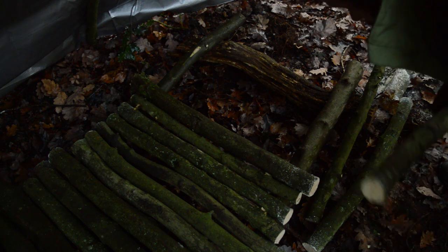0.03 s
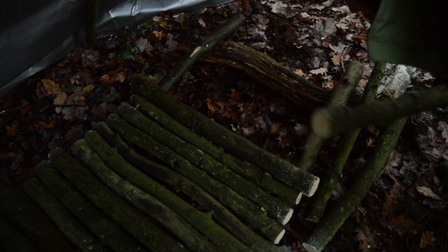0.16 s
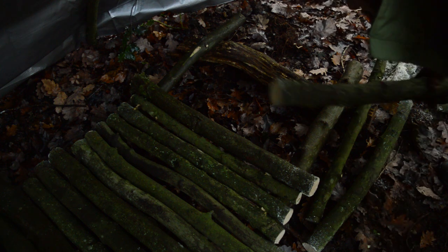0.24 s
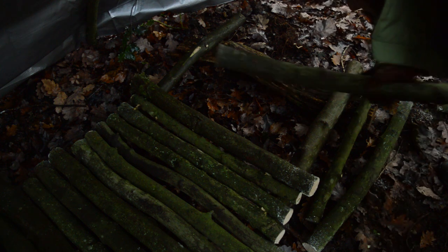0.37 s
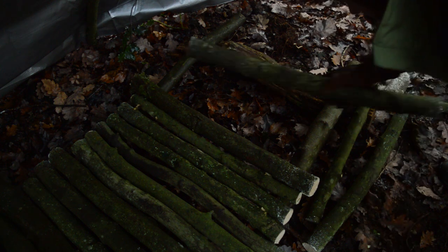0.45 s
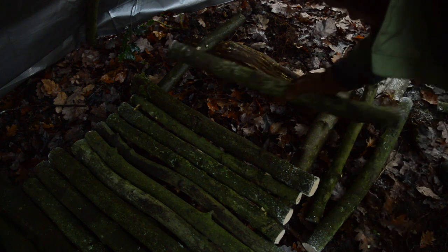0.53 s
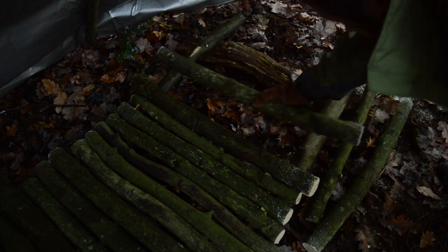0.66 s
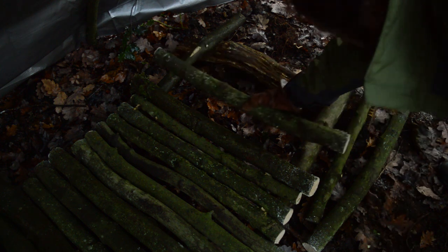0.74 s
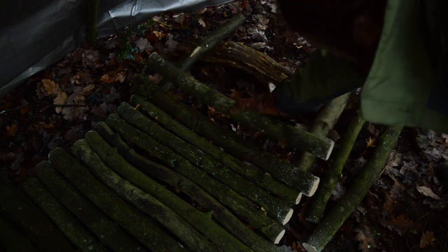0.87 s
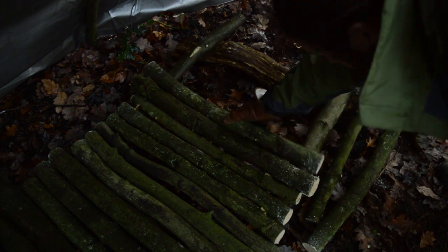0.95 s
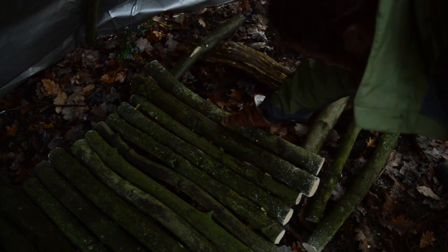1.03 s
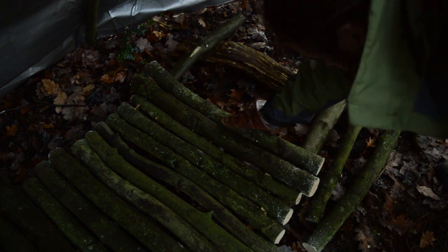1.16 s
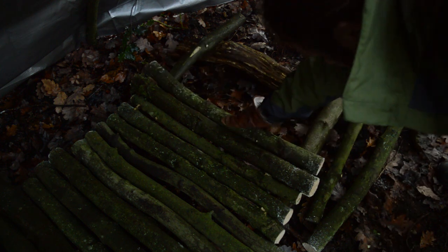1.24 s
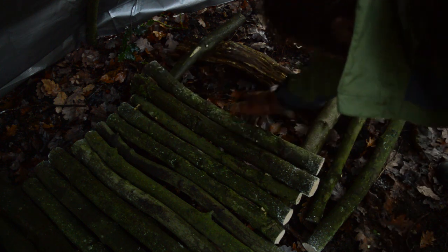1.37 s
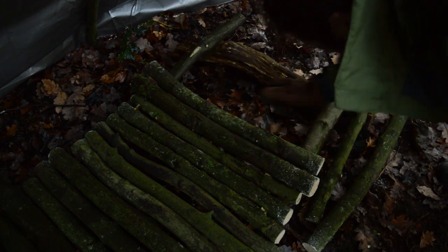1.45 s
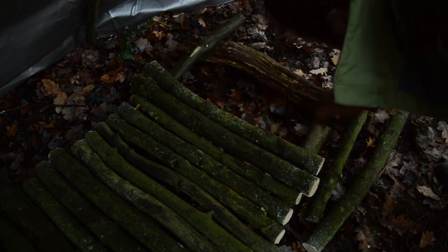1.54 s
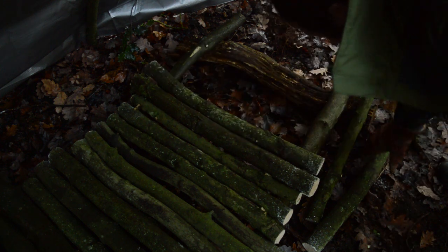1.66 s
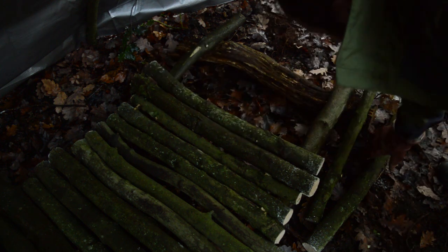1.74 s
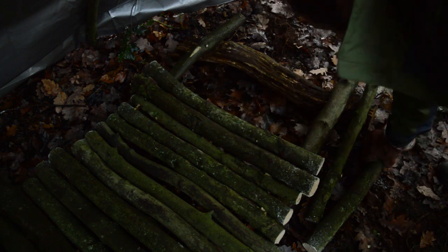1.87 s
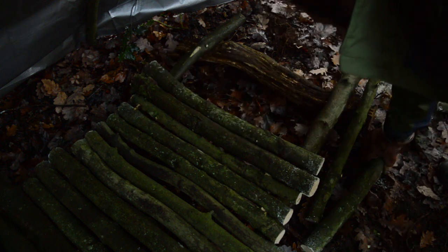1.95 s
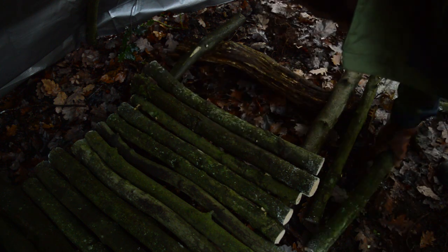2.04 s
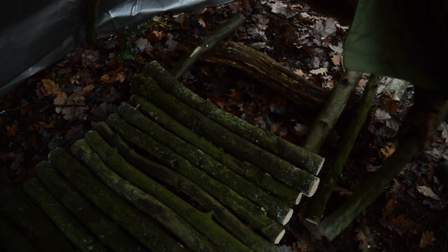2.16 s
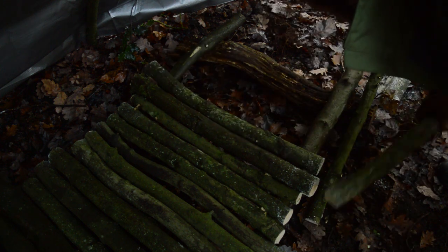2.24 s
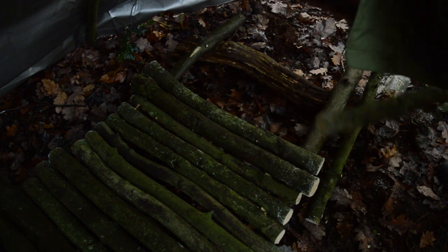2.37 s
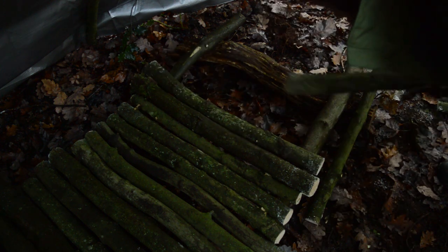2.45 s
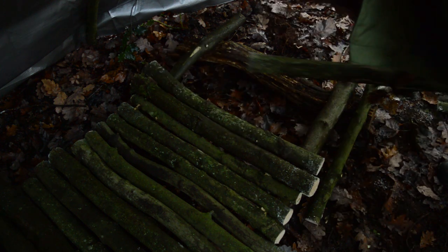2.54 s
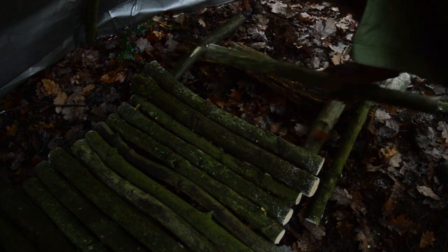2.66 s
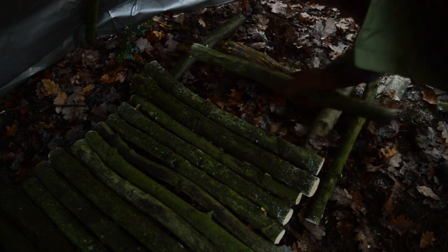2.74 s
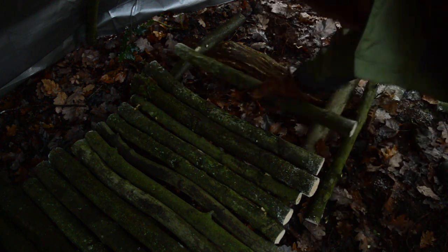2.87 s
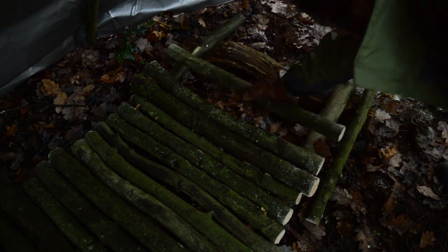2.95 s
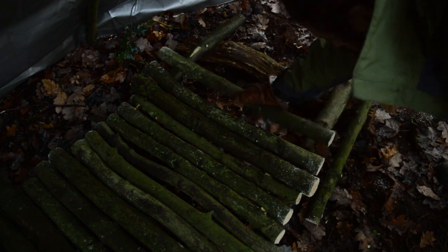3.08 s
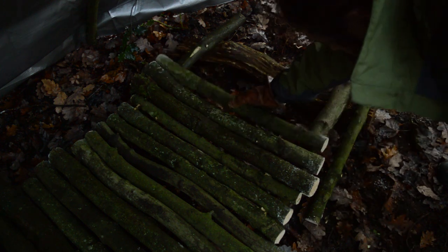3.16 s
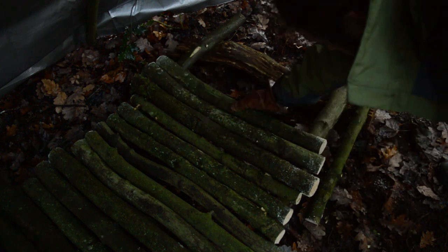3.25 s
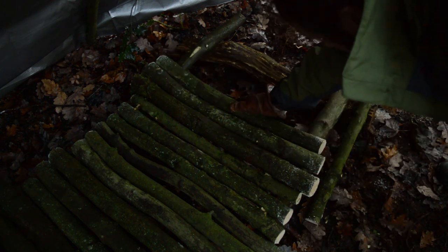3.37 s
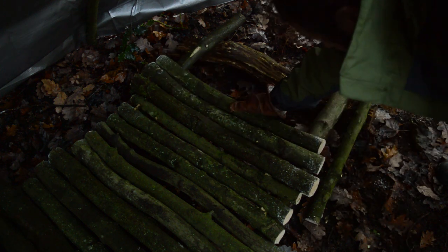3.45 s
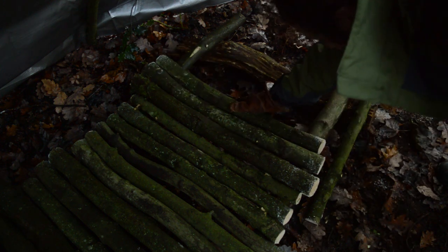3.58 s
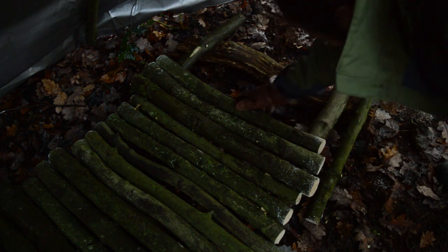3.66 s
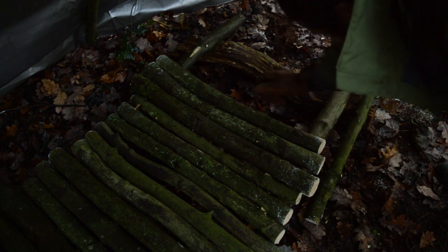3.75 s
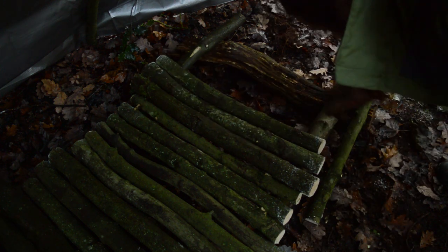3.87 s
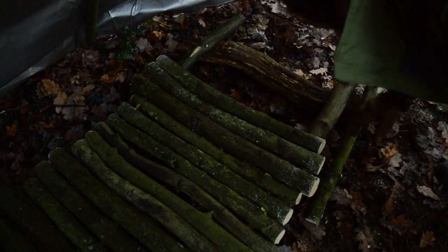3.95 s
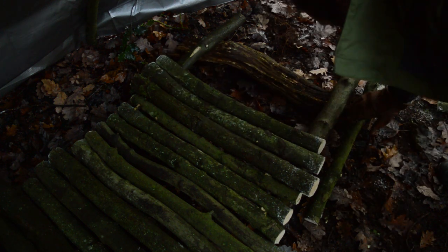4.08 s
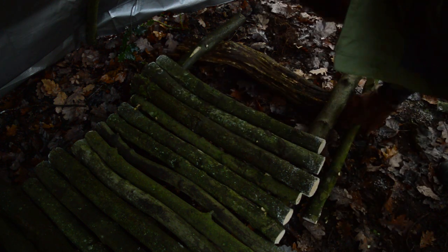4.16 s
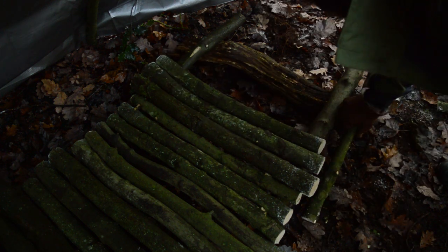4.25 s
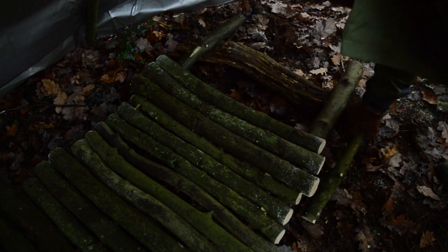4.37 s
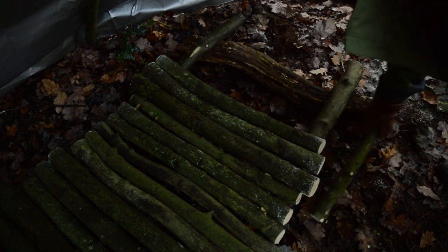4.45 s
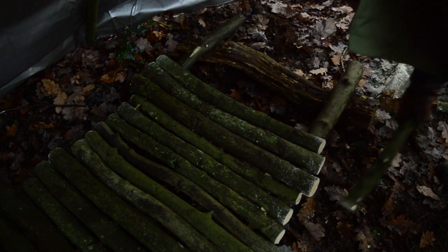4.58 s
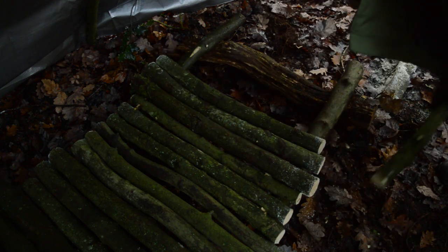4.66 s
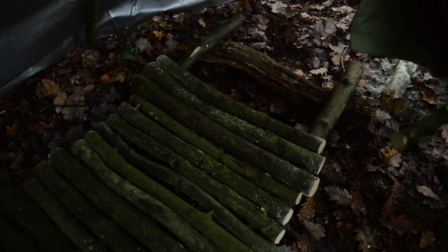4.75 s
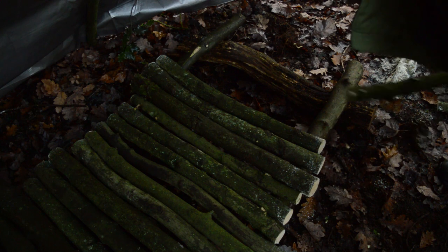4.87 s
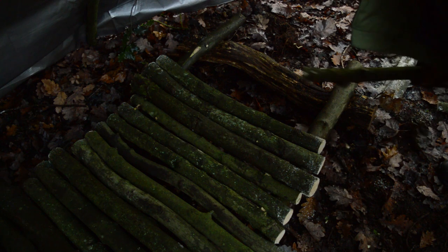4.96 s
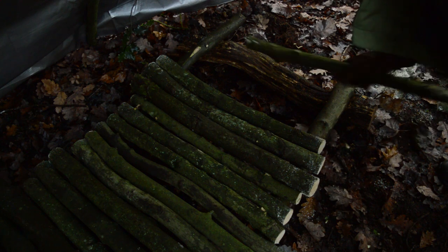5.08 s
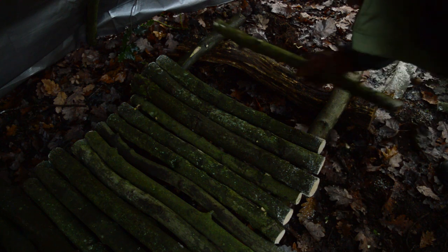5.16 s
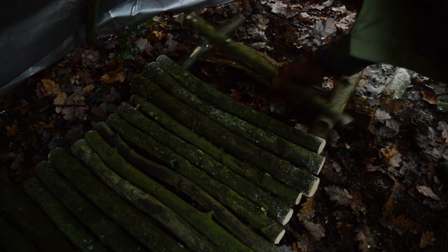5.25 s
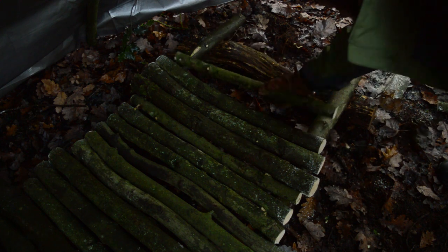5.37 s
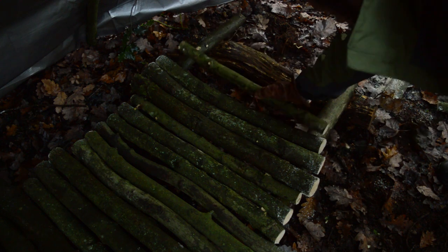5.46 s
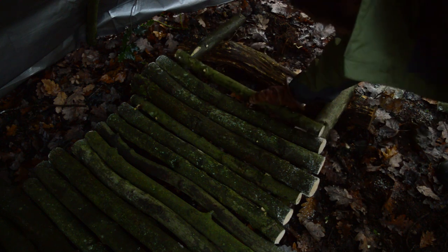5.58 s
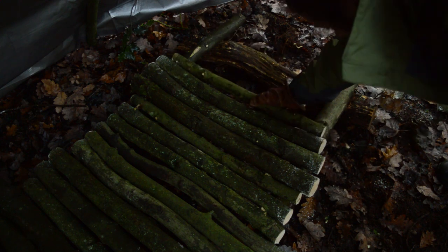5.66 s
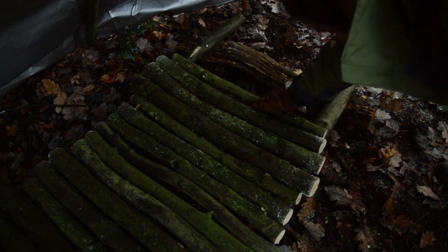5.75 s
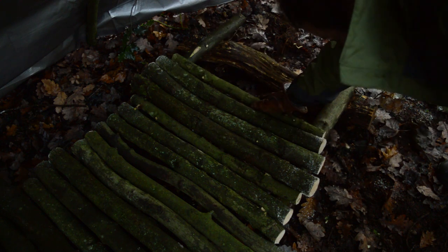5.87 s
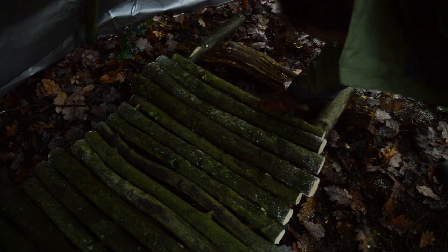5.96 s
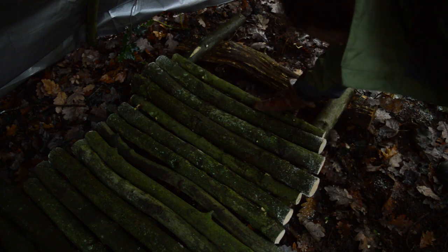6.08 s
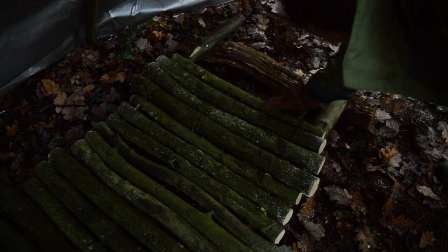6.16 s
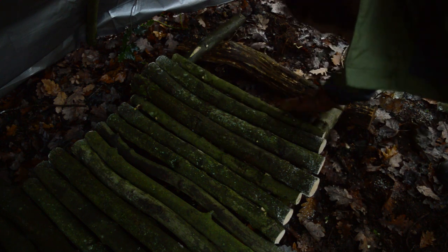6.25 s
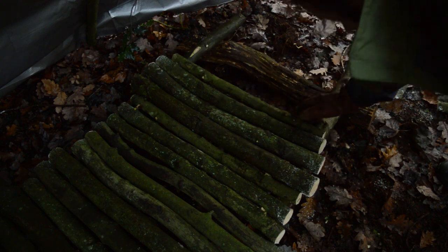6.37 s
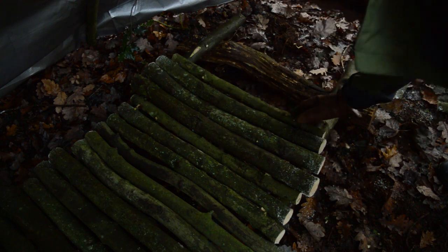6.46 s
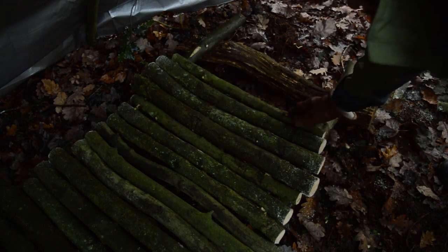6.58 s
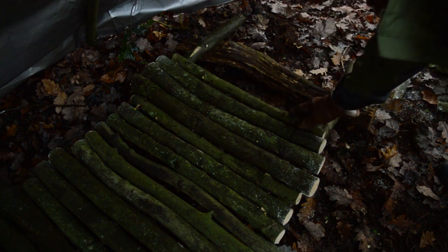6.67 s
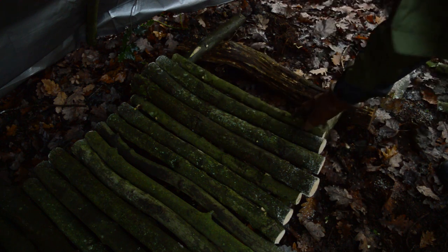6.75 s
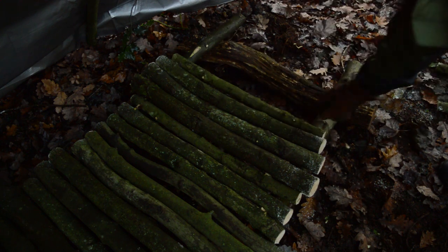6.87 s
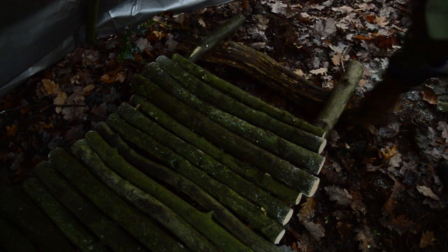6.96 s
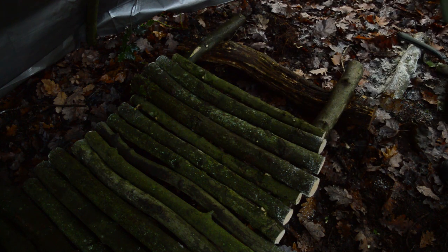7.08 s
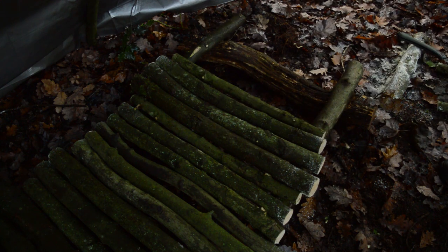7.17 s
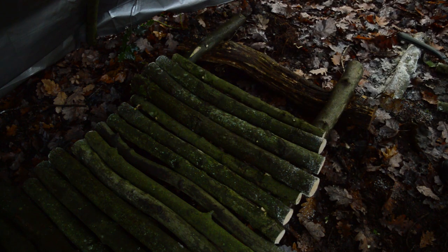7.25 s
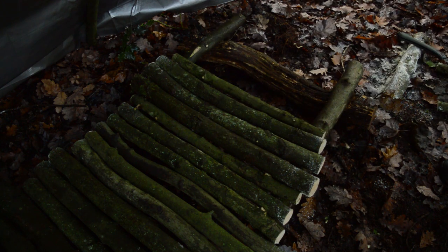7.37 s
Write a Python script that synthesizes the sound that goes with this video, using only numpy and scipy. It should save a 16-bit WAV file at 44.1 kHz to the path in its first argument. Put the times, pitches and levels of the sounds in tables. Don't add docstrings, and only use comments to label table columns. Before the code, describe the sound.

Three mossy wooden poles are set down in turn on a frame of logs, heard close and dry. The first hits loudest, the second is a compact clack, the third bounces and rocks in several small knocks. Between them, gloved handling scuffs bark, taps wood and snaps dry leaves. Soft woodland hush with distant road and occasional thin bird notes; mono, almost no echo.

```python
import sys
import numpy as np
from scipy import signal
from scipy.fft import rfft, irfft, next_fast_len
from scipy.io import wavfile
from scipy.ndimage import map_coordinates

SR = 44100
rng = np.random.default_rng(int(sys.argv[2]) if len(sys.argv) > 2 else 0)


def nominal_scale(level):
    x = np.asarray(level, float) / 20
    return 10 ** x


def wav_record(signal):
    frames = np.transpose(np.atleast_2d(signal))
    bounded = np.clip(frames, -1, 1)
    quanta = np.round(bounded * 32767).astype(np.int16)
    wavfile.write(sys.argv[1], SR, quanta)


N = 327222

# f/Hz, level/dB, time to fall 60 dB/s
FIRST_FAR = [(240, 6.5, 0.081), (284, -3, .045), (522, -14, .06), (680, -13, 0.17), (940, -32, .046),
             (1150, -24, .05), (1650, -34, .06), (1750, -30, 0.068)]
FIRST_NEAR = [(258, -1, 0.034), (477, -11, 0.033), (577, 7, 0.024), (640, -8.5, 0.13), (684, -10.5, .26),
              (900, -8, 0.016), (1104, -18, 0.098), (1720, -18, 0.014), (2280, -15.5, 0.021),
              (2500, -18.5, 0.035)]
FIRST_SEAT = [(176, 6.5, 0.062), (239, -7, .12), (271.6, -3.5, 0.14), (288, -15, .1), (377, -14, 0.07),
              (480, 2.5, 0.028), (843, -12, .09), (970, -24, .07), (1170, -22, 0.11), (1220, -23, 0.057),
              (1346, -14.5, .04), (1940, -29, 0.092)]
SECOND_FAR = [(201, -2, 0.13), (255, -2, 0.078), (480, -9, .03), (622, -12, 0.18), (1220, -19, 0.13),
              (1860, -20, 0.052), (2490, -29, 0.073), (3130, -31, 0.066), (3800, -30, 0.065)]
SECOND_NEAR = [(343, -19, 0.023), (483, 7, 0.022), (596, 5, 0.16), (644, -8, 0.24), (688, 0, 0.19),
               (920, -6, 0.09), (1000, -1.5, 0.051), (1158, -13, 0.17), (1227, -7.5, 0.11),
               (1260, -13, .09), (1447, -12, 0.075), (1820, -24, 0.15), (2460, -23.5, 0.056),
               (3900, -27, 0.078)]
SECOND_SEAT = [(131, -35, 0.064), (175, -4, 0.066), (209, -11, 0.083), (283, -1.5, 0.13), (374, 6.5, 0.022)]
THIRD_FAR = [(198, 5.5, 0.13), (242.4, 1.5, 0.29), (407, 0, 0.057), (500, -8, 0.13), (620, 0.5, 0.14),
             (698, -7, 0.089), (980, -10, 0.082), (1140, -14.5, 0.17), (1210, -2, 0.045),
             (1410, -19, 0.078), (1500, -24, .1), (1710, -25, 0.065)]
THIRD_NEAR = [(217, -8, 0.12), (402, 11.5, 0.024), (603, 2, 0.12), (664, -6.5, 0.18), (1130, -9, 0.082),
              (1230, -8, 0.054), (1810, -11, 0.069), (2436, -1, 0.03), (3800, -12.5, 0.035),
              (4570, -8, 0.032), (5250, -0.5, 0.024), (6000, -7, .03)]
THIRD_ROLL = [(194, -1.5, 0.075), (251, -9, 0.08), (387, -13, 0.088), (545, -4, 0.039), (632, -8.5, 0.069),
              (835, -15.5, 0.07), (1138.6, 0, 0.067), (1147.7, 0.5, 0.064), (1880, -23, 0.035),
              (2540, -19.5, 0.03)]
THIRD_SLIP = [(216, -1, 0.2), (430, 4, 0.03), (646, 0, 0.12), (1130, -12, .06), (2490, -20, .06)]
THIRD_ROCK = [(203, 2, 0.21), (290, 6, 0.038), (610, -2, 0.085), (1120, -15, 0.06), (2480, -22, .05)]
THIRD_SEAT = [(191.5, -19, 0.18), (300, -19, 0.039), (393, 10, 0.023), (467, -4, 0.048), (618, 5, 0.06),
              (654, -4.5, 0.12), (860, -17, 0.068), (1030, -14, 0.06), (1137, 2.5, 0.15),
              (1213, -2.5, 0.08)]
# t/s, level/dB, contact time/ms, hardness/dB per octave, frame rattle/dB, ringing
BLOWS = [(1.001, -24.5, 2.3, 6, -3, FIRST_FAR), (1.013, -2.5, 12, 0.6, -11, FIRST_FAR),
         (1.0193, -6, 2.7, 2.5, -6.5, FIRST_FAR), (1.0405, -8, 0.37, 2, -1.5, FIRST_NEAR),
         (1.048, -12.5, 0.71, 2, -4, FIRST_SEAT), (1.058, -23, 1.8, 4, -13, FIRST_SEAT),
         (3.2075, -17.5, 1.8, 1, -3.5, SECOND_FAR), (3.219, -21, 5.4, 3.5, 0, SECOND_FAR),
         (3.2414, -15.5, 0.65, 1.5, -2, SECOND_NEAR), (3.246, -13, 1.3, -1, -4, SECOND_SEAT),
         (5.3363, -21.5, 0.99, 2.5, 0.5, THIRD_FAR), (5.424, -26, 1.2, 2, -1, THIRD_NEAR),
         (5.455, -36.5, 2.7, -7.5, -16, THIRD_ROLL), (5.553, -33.5, 2.5, 3.5, -4, THIRD_SLIP),
         (5.627, -12, 3.3, 0.5, -9.5, THIRD_ROLL), (5.687, -26.5, 6.6, 5, -3, THIRD_ROCK),
         (5.696, -36.5, 3, -4, -14, THIRD_SEAT), (5.824, -20.5, 2.7, -3, -1, THIRD_SEAT),
         (5.8288, -28, 1.2, -1, -2, THIRD_SEAT)]
# f/Hz, level/dB
FRAME = [(110, -22), (200, 4), (400, -4.5), (700, -0.5), (1100, -14), (2000, -37)]
# t/s, peak level/dB, dull part/dB, strongest f/Hz, time to fall 60 dB/s
CRACKS = [(0.9952, -20, -17, 5700, 0.092), (1.0124, -13.5, -4.5, 9200, 0.054),
          (1.0207, -14, -14, 9600, 0.034), (1.0265, -25, -20, 12500, 0.026), (1.0393, 1, -16, 4870, 0.024),
          (1.047, -15.5, -17, 10200, 0.063), (1.0545, -17, -25, 12800, .05),
          (1.0595, -22, -18, 8900, 0.022), (1.07, -46, -22, 8400, 0.053), (3.2086, -23, -17, 5700, 0.04),
          (3.212, -20, -20, 10140, 0.035), (3.231, -28, -20, 9000, .04), (3.2347, -11, -19, 8740, 0.023),
          (3.2425, -10.5, -20, 9240, 0.028), (3.244, -9, -18, 8080, 0.018),
          (3.2485, -14, -20, 12940, 0.023), (3.25, -20, -8, 9000, 0.052), (2.7556, -13, -14, 9140, 0.02),
          (2.7608, -19, -17, 9600, 0.047), (3.918, -30, 5, 4800, 0.044), (3.9248, -32.5, 2, 3800, 0.043),
          (4.38, -22, -10.5, 5180, 0.093), (4.4818, -40, 16, 2590, 0.03), (5.168, -38.5, 11.5, 9100, 0.11),
          (5.316, -25.5, -19, 9800, 0.17), (5.3367, -25, 2, 8600, 0.087), (5.4213, -17, -10, 9700, 0.028),
          (5.426, -16, -17, 8540, 0.033), (5.628, -16.5, -23, 7500, 0.022),
          (5.633, -14.5, -23, 8830, 0.032), (5.815, -21.5, -14, 9530, 0.026),
          (5.825, -25, 1.5, 9400, 0.079), (5.8305, -24, -14, 9430, 0.029), (7.1916, -37, 5, 3000, 0.017),
          (7.196, -31, 4, 4270, 0.035), (7.204, -39, -9, 4270, 0.036), (7.279, -30, 4, 4000, 0.03)]
# t/s, peak level/dB, dull part/dB
SCUFFS = [(0.4918, -37, -7), (0.6397, -35, 2.5), (1.0999, -30, -18), (1.876, -32, -15), (2.051, -42, -15),
          (2.114, -33, -17), (2.128, -39, -8), (2.147, -41, -15), (2.322, -39, -17), (3.354, -35, -12),
          (3.434, -37, -20), (3.47, -35, -16), (3.674, -36, -23), (4.164, -37, -25), (5.567, -34, -20),
          (6.467, -36, -20), (6.803, -36, -20), (7.01, -41, -8), (7.358, -34, -11), (7.412, -52, -20),
          (5.265, -33, -14), (1.857, -28, -26.5), (1.975, -27, -6), (2.204, -29.5, -15),
          (2.242, -24.5, -26), (2.251, -33, -26), (2.3794, -35, -16), (2.72, -19, -13), (2.864, -31, -6),
          (2.887, -31, -21), (3.007, -24, -23), (3.3715, -25.5, -13), (3.396, -25.5, -19),
          (4.1395, -34.5, -12), (4.576, -24.5, -20), (5.452, -31, -2), (5.498, -29, -22), (5.54, -30, -18),
          (5.72, -29, -5), (6.3625, -26, -19), (6.7765, -35, -12), (6.936, -34, -3)]
# t/s, peak level/dB, dull part/dB, strongest f/Hz
SNAPS = [(0.1502, -35, 5, 5960), (1.1144, -30, -14, 5570), (1.141, -30, -20, 9350),
         (1.159, -25.5, -23, 5550), (1.166, -29, -20, 9400), (1.174, -29, -20, 6850),
         (1.201, -34, -18, 6000), (1.235, -34, -20, 7500), (1.305, -43, -20, 9350), (1.312, -36, -20, 6000),
         (1.209, -32, -22, 4300), (1.246, -28.5, -23, 6400), (1.365, -31, -17, 4970),
         (1.775, -32, -3, 4540), (1.9091, -32, 2, 5830), (2.0155, -24, -17, 5200), (2.243, -30, -20, 5900),
         (2.244, -37, -20, 7700), (6.48, -36, -20, 9600), (2.095, -33, -17, 5000), (2.074, -30, -19, 4300),
         (2.365, -35, -17, 5500), (5.479, -32, -27, 3800), (5.483, -31, -29, 6200),
         (5.686, -28.5, -12, 3750), (5.6865, -26, -20, 9500), (6.335, -26.5, -20, 7500),
         (6.346, -36, -20, 6500), (6.352, -36, -20, 4470), (6.365, -34, -15, 4320), (6.374, -33, -15, 4420),
         (6.385, -37, -17, 4340), (6.396, -36, -15, 4330), (6.407, -36, -15, 5100), (2.112, -33, -20, 4400),
         (2.145, -31, -16, 4570), (1.986, -31, -20, 3730), (3.372, -26, -20, 5150), (3.373, -28, -20, 3900),
         (3.381, -27, -18, 4730), (4.577, -31, -20, 4200), (4.372, -30, -20, 5150), (1.017, -21, -6, 3400),
         (1.025, -38, -8, 4500), (6.8694, -46, -17, 3470)]
# t/s at the loudest, level/dB, half length/ms, dull part/dB
BRUSHES = [(.94, -37.5, 50, -17), (1.57, -59, 8.5, 17), (1.61, -54, 11.5, 15.5), (1.812, -39.5, 24, -4.5),
           (3.05, -48, 14, -23), (4.2, -54, 25, -13), (5.31, -41, 4.5, -2), (7.25, -47, 31, -12),
           (1.66, -50, 43, 5), (3.99, -45, 37, -3.5), (4.383, -36.5, 16, -17), (4.475, -43, 20, -11),
           (4.53, -36, 12, -18), (5.326, -33, 10, -10), (6.37, -37.5, 40, -10.5), (6.405, -50, 22, -22)]
# f/Hz, level/dB per Hz
CRISP = [(1470, -34), (2500, -3.5), (3260, -4), (3800, -5.5), (4240, -1), (4650, -2), (7190, 2.5),
         (9290, 10.5), (13100, -2.5), (16000, -16)]
# f/Hz, level/dB per Hz
DULL = [(500, 5), (1000, 10), (1800, 6.5), (3000, -3), (5000, -16)]
# f/Hz, level/dB per Hz
LEAVES = [(1800, -6), (3200, 1.5), (4500, -0.5), (6500, 0), (9000, -12.5)]
# t/s, peak level/dB, f/Hz, time to fall 60 dB/s
TAPS = [(0.061, -36.5, 900, 0.088), (0.571, -32.5, 985, 0.046), (.589, -34.5, 1500, 0.039),
        (0.999, -26, 1880, .03), (1.561, -33, 1560, 0.04), (1.589, -30.5, 520, 0.07),
        (1.606, -32, 620, 0.061), (1.616, -30, 556, .04), (1.645, -33, 980, 0.028),
        (2.424, -31, 784, 0.035), (2.644, -35, 1320, .03), (2.657, -32, 1200, 0.025),
        (2.787, -29, 1610, 0.025), (2.792, -38, 996, .08), (2.838, -26.5, 1150, 0.023),
        (2.8425, -27, 1900, 0.011), (3.368, -21.5, 1500, 0.013), (3.909, -30, 1400, 0.025),
        (3.9135, -26, 900, 0.014), (3.919, -32, 1090, 0.013), (3.924, -29, 1820, 0.02),
        (3.974, -37, 1400, 0.03), (3.978, -30.5, 1730, .02), (4.467, -33, 1750, 0.045),
        (4.483, -29, 1690, .01), (4.483, -23.5, 1306, 0.038), (4.53, -35, 1720, 0.035),
        (4.849, -33, 940, 0.028), (5.169, -26.5, 610, 0.014), (7.15, -31, 900, 0.034),
        (7.1907, -23, 1310, 0.01), (7.203, -32, 900, .015), (7.279, -39, 1030, 0.03)]
# f/Hz, level/dB per Hz
SLEEVE = [(5000, -17.5), (7500, -11), (9300, -1), (11500, -12), (13500, -32), (16000, -28)]
# t/s, effort level/dB, sleeve over leaves/dB
EFFORT = [(0, -56.5, 0.5), (.3, -58, 1.5), (.6, -57, 2.5), (.93, -60.5, 3.5), (1.1, -56, 5), (1.4, -60, 4),
          (1.62, -56, 0), (1.98, -53.5, 2), (2.09, -49, 3), (2.2, -52.5, 4), (2.28, -60, 3),
          (2.81, -55.5, 0), (3.0, -57.5, 3.5), (4.07, -59.5, 2.5), (4.53, -57.5, 2.5), (4.9, -59.5, 2.5),
          (5.35, -54.5, 1), (6.1, -60.5, 3.5), (6.7, -57, 2), (7.1, -58, 4), (7.25, -55.5, 5),
          (7.42, -55, 5.5)]
# t/s, length/s, f/Hz, level/dB
BIRD_NOTES = [(1.54, .09, 4480, -58), (1.62, .11, 4480, -60), (1.57, .06, 6550, -59),
              (1.575, .09, 3020, -54), (1.62, .03, 8200, -60), (1.635, .075, 2760, -53),
              (1.665, .115, 3470, -55), (1.64, .03, 6250, -59), (1.79, .05, 7700, -60),
              (.03, .1, 3600, -62), (.04, .1, 5000, -62), (1.79, .045, 5100, -57), (2.11, .07, 3350, -59),
              (2.15, .1, 3420, -61), (1.82, .1, 3330, -61), (3.447, .2, 3240, -66), (6.57, .03, 3450, -59),
              (6.605, .085, 3430, -60), (6.71, .045, 3480, -58), (6.858, .025, 3570, -52)]
# f/Hz, level/dB per Hz
HUSH = [(12, -46), (20, -10), (55, 0.5), (101, -4), (388, -6), (446, -7.5), (513, -7.5), (1000, -8),
        (1220, -11.5), (2020, -18), (2750, -20.5), (3250, -22.5), (6360, -26), (9400, -22.5), (16000, -36)]
# f/Hz, time to fall 60 dB/s
TREE_ECHO = [(200, 0.056), (1000, 0.043), (8000, 0.19)]


def unit(x):
    return x / np.sqrt(np.mean(x ** 2) + 1e-20)


def along(points, hz):
    f, v = np.transpose(points)
    return np.interp(np.log(hz + 1), np.log(f + 1), v)


def curves(rows):
    s, *columns = np.transpose(rows)
    return [np.interp(np.arange(N) / SR, s, column) for column in columns]


def wobble(rate):
    knots = rng.standard_normal(int(N * rate / SR) + 4)
    return map_coordinates(knots, [np.arange(N) * rate / SR])


def filtered(x, response):
    m = next_fast_len(N + 8192)
    return irfft(rfft(x, m) * response(np.fft.rfftfreq(m, 1 / SR)), m)[:N]


def noise(spectrum, grain_db=0):
    sizes = nominal_scale(grain_db * np.minimum(rng.exponential(size=N), 6))
    grains = sizes * rng.standard_normal(N)
    return unit(filtered(grains, lambda hz: nominal_scale(along(spectrum, hz))))


def add(track, s, sound):
    track[round(s * SR):][:len(sound)] += sound


def poles():
    out, t = np.zeros(N + SR), np.arange(SR // 2) / SR
    rattle_t60 = 0.079
    for s, db, contact_ms, hardness_db, rattle_db, modes in BLOWS:
        ring = np.zeros(len(t))
        for k, (hz, level, t60) in enumerate(modes):
            side = (-1) ** k
            tilt_db = hardness_db * np.log2(hz / 600)
            ring += side * nominal_scale(level + tilt_db - 60 * t / t60) * np.sin(2 * np.pi * hz * t)
        hz = np.geomspace(110, 2000, num=22)[:, None] * rng.uniform(0.98, 1.05, (22, 1))
        swing = np.sin(2 * np.pi * (hz * t + rng.random((22, 1))))
        logs = nominal_scale(along(FRAME, hz) - 60 * t / rattle_t60) * swing
        knock = ring + 0.5 * nominal_scale(rattle_db) * logs.sum(axis=0)
        build_up = 1 - np.exp(-t * 1000 / contact_ms)
        add(out, s, nominal_scale(db) * knock * build_up)
    return signal.sosfilt(signal.butter(2, 110, "high", fs=SR, output="sos"), out[:N])


def scuffs():
    (crisp, twig, dull, flake), t = np.zeros((4, N + SR)), np.arange(SR // 4) / SR
    usual_hz, spread, scuff_t60, snap_t60 = 9400, 0.0584, 0.057, 0.026
    crisp_tilt, twig_tilt = 2, -11
    rise_share = 0.011
    leaf_db, leaf_t60 = -2, 0.04
    wander = np.cumsum(rng.standard_normal(N + SR))

    def fuzzy_ring(s, hz, fuzz):
        return np.sin(2 * np.pi * hz * t + fuzz * wander[round(s * SR):][:len(t)])

    bursts = [(*row, usual_hz * (1 + spread * rng.uniform(-0.88, 1)), scuff_t60) for row in SCUFFS]
    bursts += [(*row, snap_t60) for row in SNAPS]
    for s, db, dull_db, hz, t60 in bursts + CRACKS:
        shape = nominal_scale(db - 60 * t / t60) * (1 - np.exp(-t / (rise_share * t60)))
        octaves = np.log2(hz / usual_hz)
        add(crisp, s, shape * nominal_scale(crisp_tilt * octaves))
        add(twig, s, shape * nominal_scale(twig_tilt * octaves))
        add(dull, s, shape * nominal_scale(dull_db))
        add(flake, s, shape * fuzzy_ring(s, hz, 0.39))
    for s, db, _, hz in SNAPS:
        add(flake, s, nominal_scale(db + leaf_db - 60 * t / leaf_t60) * fuzzy_ring(s, hz, 0.15))
    now = np.arange(N + SR) / SR
    for s, db, half_ms, dull_db in BRUSHES:
        shape = nominal_scale(db + 7) * np.exp(-((now - s) * 1000 / half_ms) ** 2)
        crisp += shape
        dull += shape * nominal_scale(dull_db)
    bark = nominal_scale(-14.5) * crisp[:N] * noise(CRISP, grain_db=1.3)
    twigs = nominal_scale(-29) * twig[:N] * noise(LEAVES, grain_db=3)
    wood = nominal_scale(-10.0) * dull[:N] * noise(DULL, grain_db=2.0)
    return bark + twigs + nominal_scale(-14.0) * flake[:N] + wood


def taps():
    out, t = np.zeros(N + SR), np.arange(SR // 4) / SR
    tones = ((1, 0.99), (0.5, -0.12), (1.214, 0.51), (1.9, -0.17))
    rise = 1 - np.exp(-t / 0.00031)
    for s, db, hz, t60 in TAPS:
        ring = sum(size * np.sin(2 * np.pi * ratio * hz * t) for ratio, size in tones)
        add(out, s, nominal_scale(db - 6.0 - 60 * t / t60) * ring * rise)
    return out[:N]


def rustle():
    out, shared = np.zeros(N), wobble(25)
    still_db = -61
    effort_db, sleeve_db = curves(EFFORT)
    bark_db = -56 + 0.44 * (effort_db - effort_db.mean()) + 1.74 * wobble(4.16)
    layers = ((effort_db + sleeve_db, still_db + 3.5, SLEEVE),
              (effort_db, still_db, LEAVES),
              (bark_db, still_db + 2.0, DULL))
    for db, floor_db, colour in layers:
        excess = np.sqrt(np.maximum(nominal_scale(2 * db) - nominal_scale(2 * floor_db), 0))
        clumps_db = 1.5 * shared + 1.3 * wobble(30) + 0.5 * wobble(90) + 2.5 * wobble(250)
        out += excess * nominal_scale(clumps_db) * noise(colour, grain_db=2.0)
    return out


def bird():
    out = np.zeros(N + SR)
    drift = 1 + 0.014 * wobble(150) + 0.004 * wobble(12)
    for s, length, hz, db in BIRD_NOTES:
        pitch = drift[round(s * SR):][:round(length * SR)]
        if length < 0.04:
            pitch = pitch - 0.07 * np.linspace(-0.5, 0.5, len(pitch))
        whistle = np.sin(2 * np.pi * np.cumsum(hz * pitch) / SR)
        add(out, s, nominal_scale(db) * np.hanning(len(pitch)) ** 0.27 * whistle)
    return out[:N] * nominal_scale(3 * wobble(110))


def trees(x):
    hz, _, z = signal.stft(rng.standard_normal(SR // 2), SR, nperseg=256)
    t = _
    fade = nominal_scale(-60 * t / along(TREE_ECHO, hz)[:, None])
    tail = signal.istft(z * fade, SR, nperseg=256)[1]
    late = np.pad(x, (300, 0))
    return signal.fftconvolve(late, tail / np.linalg.norm(tail))[:N]


def hush():
    wash = nominal_scale(-47.5) * noise(HUSH)
    road = filtered(wash, lambda hz: 1 / (1 + (hz / 2000) ** 4))
    return wash - road + road * nominal_scale(0.18 * wobble(2.15) + 0.54 * wobble(6))


def scene():
    sources = poles() + scuffs() + taps() + bird()
    return (sources + nominal_scale(-16.0) * trees(sources) + rustle() + hush())[None]


def top_cut(x):
    return signal.sosfilt(signal.butter(12, 17000, fs=SR, output="sos"), x)


def record(dry):
    soft = dry[0] / (1 + np.abs(dry[0] / 0.97) ** 8) ** (1 / 8)
    mix = filtered(soft, lambda hz: hz < 15850)
    return top_cut(mix[None])


dry = scene()
out = record(dry)
wav_record(out)
```